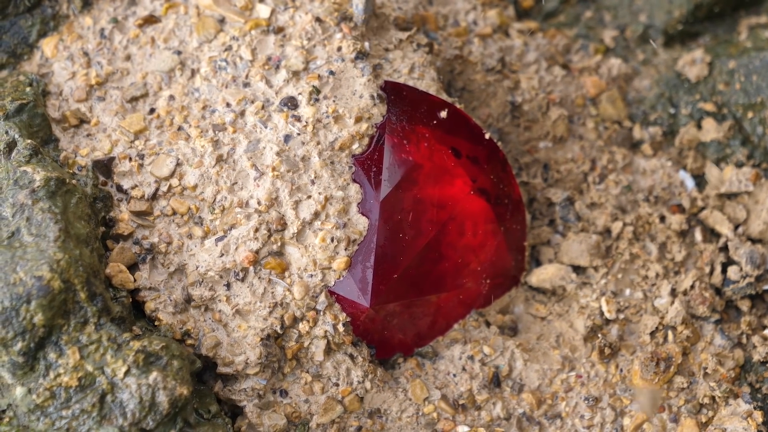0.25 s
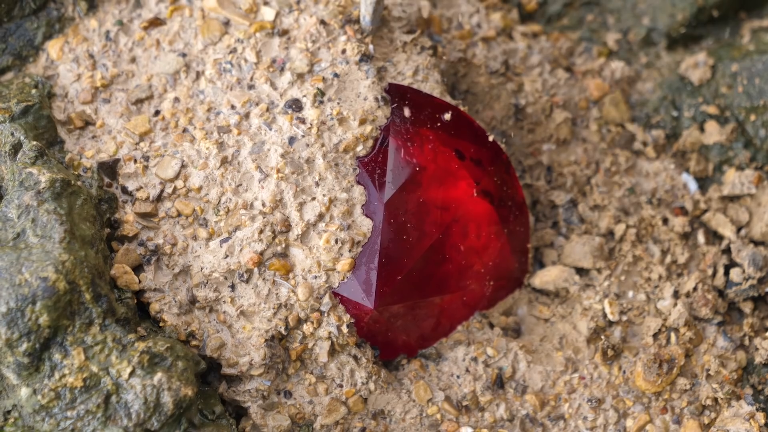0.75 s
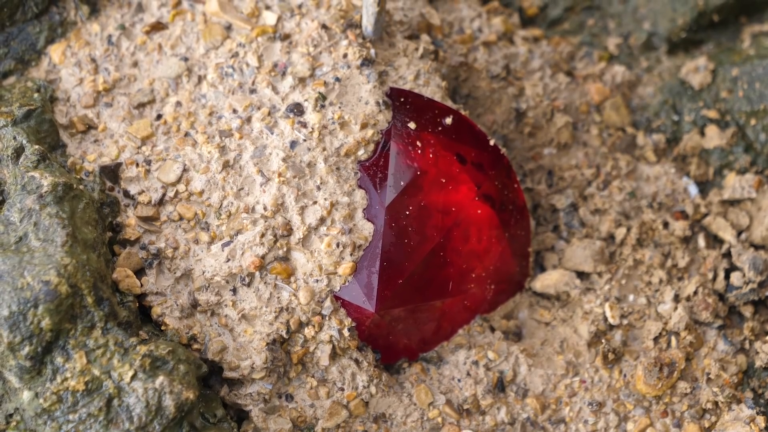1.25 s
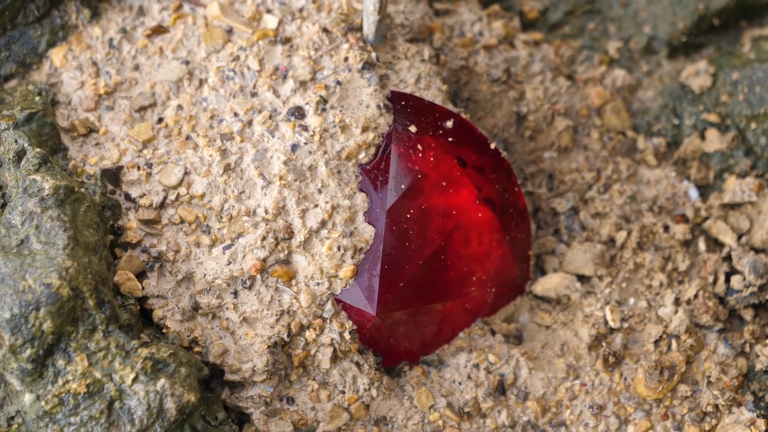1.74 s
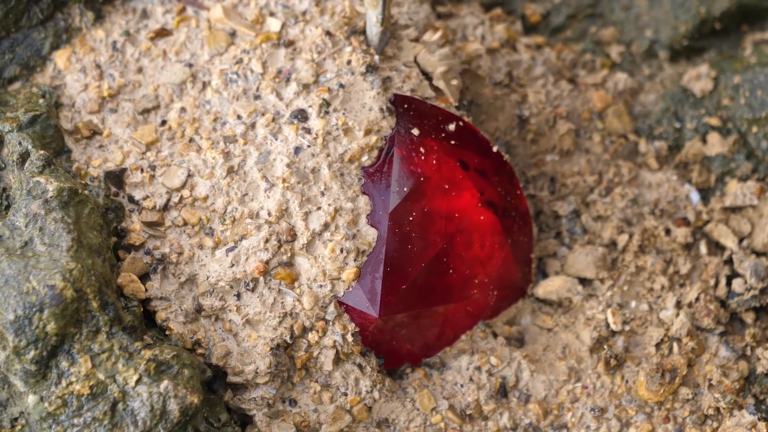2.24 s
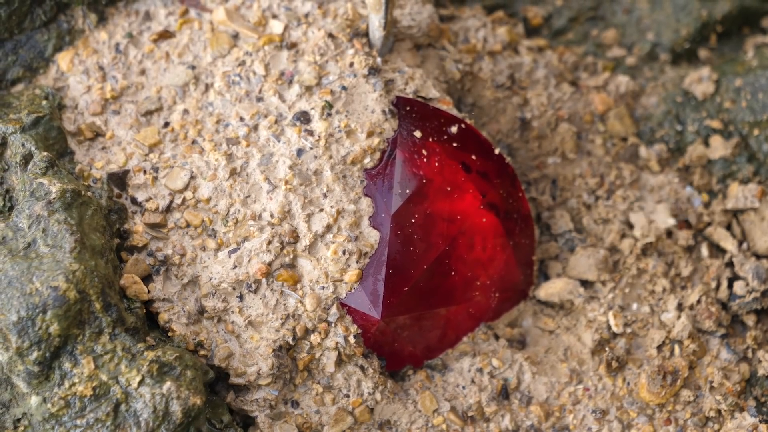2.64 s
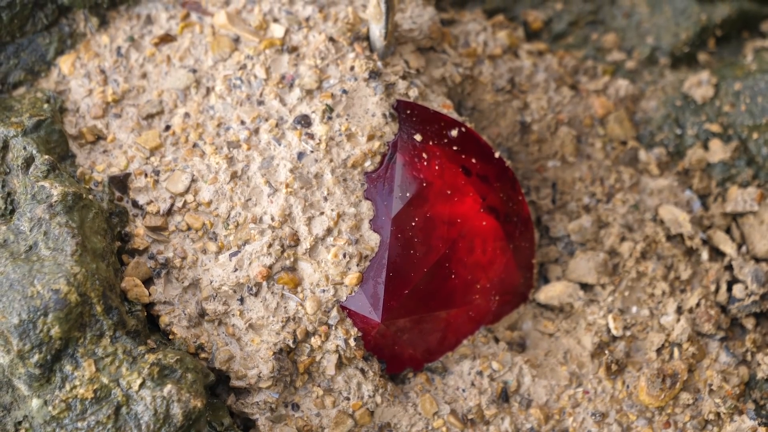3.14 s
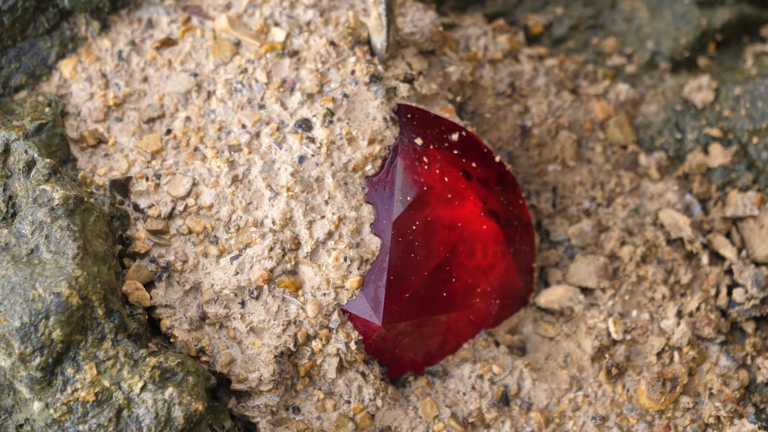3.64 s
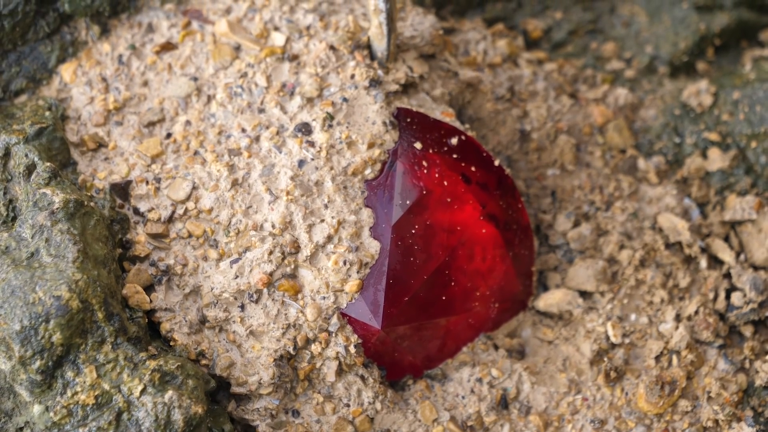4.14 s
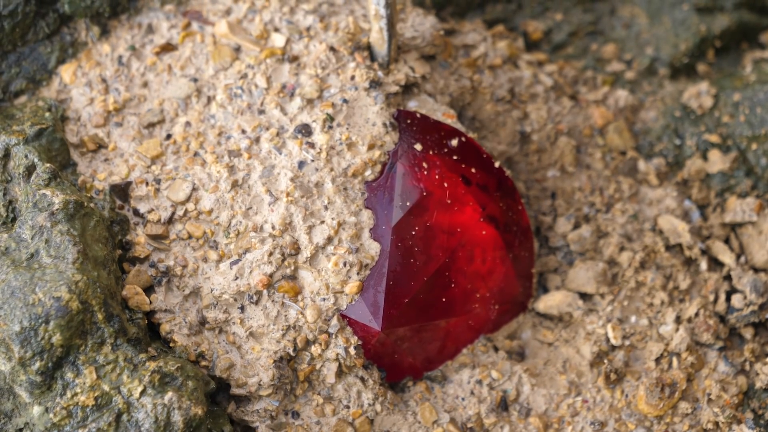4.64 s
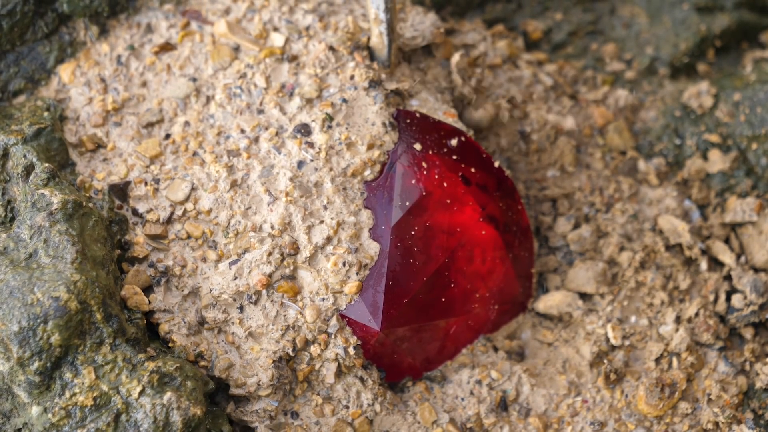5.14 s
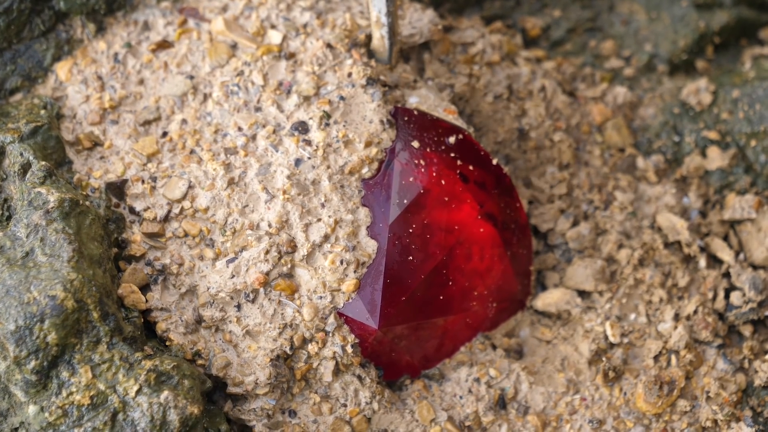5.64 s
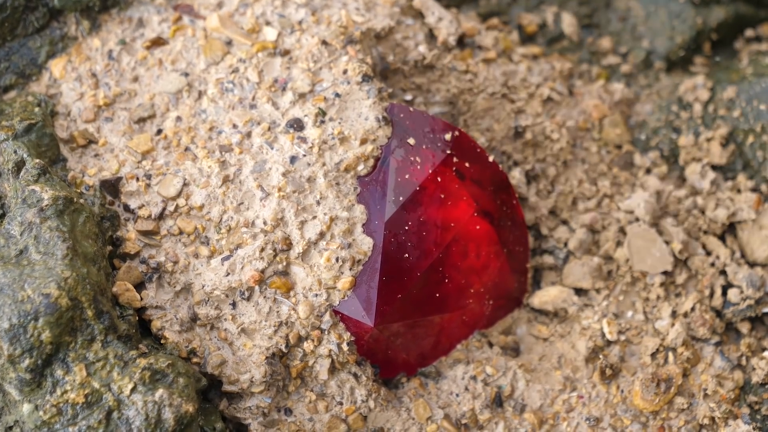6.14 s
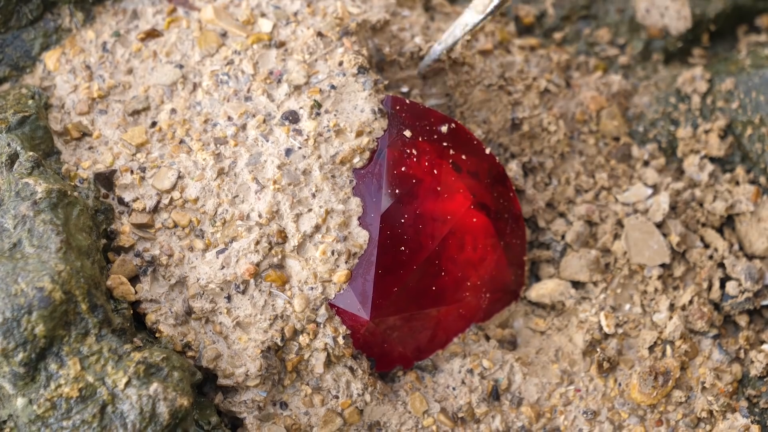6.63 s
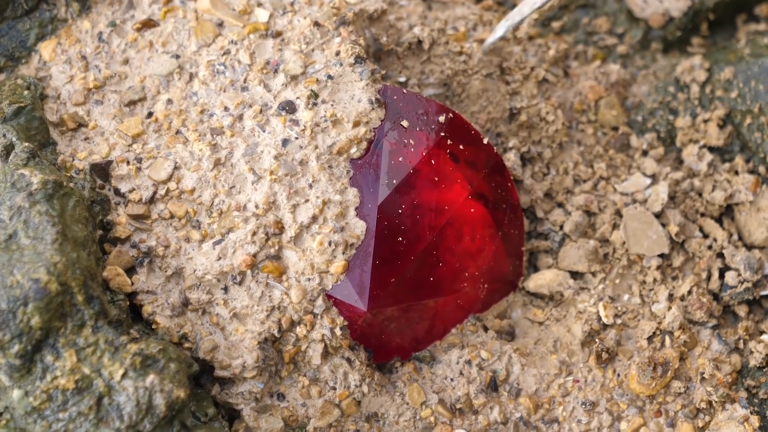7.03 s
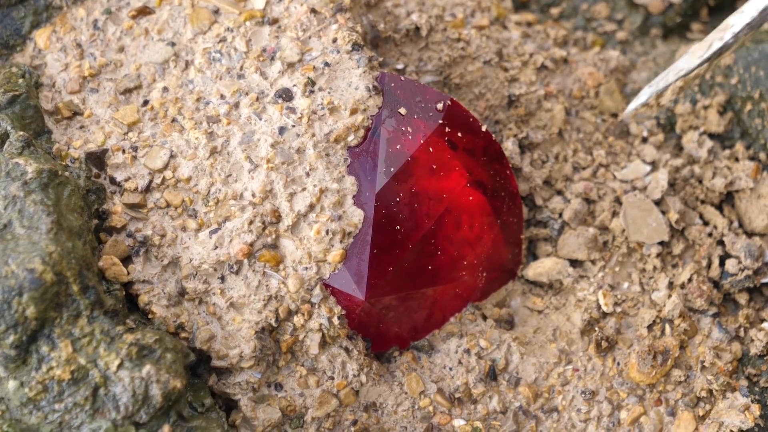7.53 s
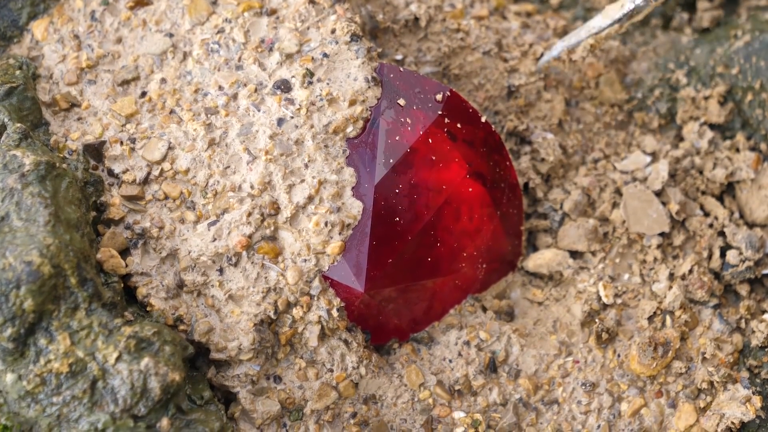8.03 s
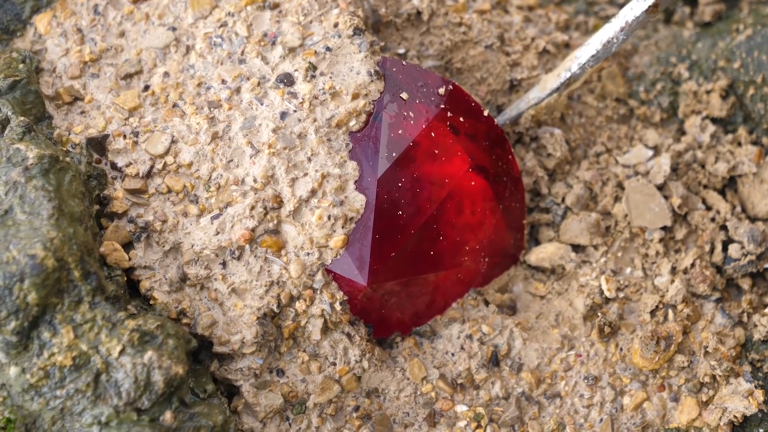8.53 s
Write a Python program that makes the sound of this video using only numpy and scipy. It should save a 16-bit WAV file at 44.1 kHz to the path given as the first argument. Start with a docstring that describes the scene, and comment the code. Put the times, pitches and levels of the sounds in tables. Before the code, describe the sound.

Close up outdoors, a steel pick chips at crumbly sandstone. From 0 to about 5.6 seconds it taps steadily, a little over four times a second: very short, loud, dry clicks with a sandy crunch and a quickly damped metallic ring. Their weight varies; some are thin and bright, while those from about 3 seconds on are often fuller and more biting. Faint short echoes and tiny falling crumbs follow. After the last tap near 5.6, quieter short scrapes begin: a gritty one with snapping grains at 6.0-6.1, a scratchy cluster from 6.5 to 7.5, another clear stroke at 7.7, a duller one around 8.2, then barely audible brushing near 8.5. Scrapes sit slightly right. Behind lies soft, uneven distant rumble and hiss, with faint, falling bird whistles near 1.3, 3.1 and 7.9 seconds.

```python
"""Steel pick in sandstone

A steel pick taps crumbly sandstone about four times a second, close by and outdoors, then scrapes in short strokes.
Taps are filtered noise bursts plus decaying sines; scrapes are random grains and slips coloured by resonances.
Single bright ticks are falling crumbs. Faint filtered-noise echoes follow the pick. Behind it lie a distant
rumble and hiss of shaped noise, and a small bird made of gliding sines."""
import sys
import numpy as np
from scipy import signal
from scipy.fft import rfft, irfft
from scipy.io import wavfile
from scipy.ndimage import uniform_filter1d

SR = 44100
rng = np.random.default_rng(int(sys.argv[2]) if len(sys.argv) > 2 else 0)


def generate_wav(sig):
    """Save sig (samples, or channels by samples) to the path in sys.argv[1] as 16-bit PCM at SR."""
    pcm = np.round(np.clip(np.atleast_2d(sig).T, -1, 1) * 32767).astype(np.int16)
    wavfile.write(sys.argv[1], SR, pcm)


N = 387198  # length in samples
FILTER_LENGTH = 4096  # samples
HZ = np.fft.rfftfreq(FILTER_LENGTH, 1 / SR)  # the frequencies at which every colour is drawn

# The taps of the pick. Each row: start in seconds, boost of the stone's low body (below about 1.6 kHz) in dB.
BLOWS = [(-.018, -18), (.215, -8.5), (.4456, -6), (0.6866, -5.5), (0.9203, 1), (1.1553, 0), (1.3897, -9.5),
         (1.6277, 6.5), (1.858, -0.5), (2.091, -13.5), (2.3262, -17), (2.5593, -5), (2.7891, -7),
         (3.0208, 3), (3.251, 2), (3.4903, -9), (3.722, 0), (3.9526, 4), (4.1863, 3), (4.4245, -7.5),
         (4.6613, 3.5), (4.8923, 4.5), (5.1239, 3), (5.351, 5), (5.5758, 7)]
# The scraping strokes. Each row: start in seconds, length in seconds, level in dB, contact resonance in Hz.
STROKES = [(5.779, .11, -50, 9000), (6.035, 0.092, -22, 4280), (6.499, 0.067, -22.5, 3520),
           (6.707, 0.031, -29.5, 2570), (6.763, 0.088, -26.5, 3980), (6.956, .012, -31, 3400),
           (6.983, 0.078, -28, 4800), (7.134, .06, -35, 3827), (7.215, .065, -33.5, 3760),
           (7.355, 0.042, -34, 3173), (7.402, 0.077, -30.5, 3210), (7.678, .03, -34, 2397),
           (7.719, .1, -21.5, 3940), (8.226, 0.059, -24.5, 2203), (8.47, 0.051, -43.5, 2203),
           (8.577, 0.13, -54.5, 4300)]


def taps(crush_s=0.00094, length_s=0.0031, ripple_db=1.4, dull_share=0.41):
    """Each blow crushes and scatters sand and sets the steel ringing; the stone damps it by a varying amount."""
    # Broad colour of a tap. Each row: frequency in Hz, level in dB.
    tap_colour = [(40, -43), (200, -15.5), (600, -16.5), (1300, -8), (2800, -6.5), (5000, -5), (7700, -7.5),
                  (9200, -2.5), (11000, -12.5), (15000, -14.5)]
    # Resonances of the pick wedged in the stone. Each row: frequency in Hz, width in Hz, boost in dB.
    wedged_modes = [(1860, 85, 3.5), (2542, 100, 6.5), (3663, 178, 12), (4490, 350, 6.5), (6380, 457, 11.5),
                    (9000, 740, 4)]
    # Free ringing of the steel. Each row: frequency in Hz, level in dB, seconds to fade by 60 dB before damping varies.
    steel_modes = [(9120, -22.5, 0.12), (9140, -27, 0.0406), (3530, -28, 0.023), (1806, -32, 0.041)]
    # Bite near 6 kHz, which drifts up and down over the taps; when it is strong, the band near 4.8 kHz is weaker.
    # Each row: time in seconds, boost in dB.
    bite_course = [(0, -2), (1.2, -5.5), (2.3, -2), (3, 7), (4, 1.5), (5, -0.5), (5.5, 5)]
    tap_db, ring_db, ring_spread_db = -6.5, 8.5, 3.5
    crumble_after_s, crumble_db = .0018, -5.5  # the crushed sand gives way once more
    spray_db, spray_s = -26, .016  # loosened sand sprays from each tap and dies away
    out = np.zeros((2, N))
    t = np.arange(2 * FILTER_LENGTH) / SR
    spray_fade = np.exp(-t[:FILTER_LENGTH] / spray_s)
    for start, body_db in BLOWS:
        bite_db = np.interp(start, *np.transpose(bite_course))
        steel_db = ring_db + ring_spread_db * rng.standard_normal()
        body = body_db * below(1600)
        bite = bite_db * (hump(6150, 750) - dull_share * hump(4800, 410))
        tone = colour(tap_colour, wedged_modes) + body + bite + ripple_db * ripple()

        crush = fracture(crush_s, even=0.86)
        add(crush, crumble_after_s, amp(crumble_db) * fracture(crush_s, even=1.0))
        tap = signal.fftconvolve(crush, response(tone)) * np.sqrt(length_s * SR)

        spray = amp(spray_db) * grit(FILTER_LENGTH, spray_db) * spray_fade
        add(tap, 0, signal.fftconvolve(spray, response(colour(tap_colour) + body)))

        for hz, mode_db, t60 in steel_modes:
            detune = rng.normal(1, .002)
            damping = rng.uniform(.9, 2.0)
            fade = amp(steel_db + mode_db - 60 * damping * t / t60)
            add(tap, 0, fade * np.sin(2 * np.pi * hz * detune * t))
        add(out, start, outdoors(amp(tap_db) * tap, wet_db=7.5))
    return out


def fracture(decay_s, even):
    """A burst of micro-cracks of energy 1: noise that rises fast and dies away; 'even' flattens its spectrum."""
    t = np.arange(FILTER_LENGTH) / SR
    shape = (1 - np.exp(-t / 0.00029)) * np.exp(-t / decay_s)
    spectrum = rfft(rng.standard_normal(FILTER_LENGTH) * shape)
    flattened = spectrum / (abs(spectrum) + 1e-9) ** min(even, 1)
    burst = irfft(flattened) * (t < .02)
    return burst / np.linalg.norm(burst)


def scrapes(grit_db=-2, count=12):
    """The point drags over sand, catching and slipping under a changing pressure; some large grains snap."""
    # The largest grains that snap under the point. Each row: time in seconds, level in dB, contact resonance in Hz.
    snap_rows = [(6.0745, -4.5, 4340), (6.1, -8, 4330), (6.116, -3.5, 4370), (6.1347, -17, 4000),
                 (6.402, -24.5, 1600), (6.5088, -11.5, 3700), (6.541, -11, 3740), (6.796, -12.5, 3680),
                 (6.8092, -11, 3600), (6.818, -12, 4400), (7.0355, -17, 4800), (7.1423, -21, 3660),
                 (7.2627, -18.5, 6480), (7.2909, -17, 3040), (7.4597, -11, 3440), (7.7541, -8.5, 4400),
                 (8.1101, -23, 2274), (8.2502, -14, 2195), (8.2806, -11, 2210)]
    press_share = 0.6  # the hand bears down for this share of a stroke, then lifts
    slips_per_s, slip_db, slip_spread_db = 75, 6, 7.5  # dB above the stroke's level, and spread either way
    contact_db = 7.5
    out = np.zeros((2, N))
    for start, length, db, contact_hz in STROKES:
        n = round(length * SR)
        pressure_phase = np.interp(np.arange(n) / n, [0, press_share, 1], [0, np.pi / 2, np.pi])
        pressure = np.sin(pressure_phase)
        drive = np.zeros(n + FILTER_LENGTH)
        for k, (late, size) in enumerate(rng.uniform(-1, 1, (count, 2))):
            slip_s = (k + .5 + late / 2) / slips_per_s
            if slip_s * SR < n:
                slip = snap(db + slip_db + slip_spread_db * size)
                add(drive, slip_s, pressure[int(slip_s * SR)] * slip)
        add(drive, 0, amp(db + grit_db) * grit(SR // 4, db)[:n] * evened(pressure))
        add(out, start, through_pick(drive, contact_hz, contact_db))
    for start, db, contact_hz in snap_rows:
        add(out, start, through_pick(snap(db), contact_hz, contact_db=13.5))
    return out


def grit(n, db, grains_per_s=400, spread_db=4, clump_db=4.0, count=3):
    """Sand catches in clumps, each kind of grain with its own colour; more pressure, more grains; rms 1."""
    rate = grains_per_s * amp(db + 31.0) ** .5  # the given rate holds at -31 dB
    out = np.zeros(n)
    for _ in range(count):
        sizes = amp(spread_db * np.minimum(rng.exponential(1, n), 3)) * rng.choice([-1, 1], n)
        clicks = (rng.random(n) < rate / SR) * sizes
        grains = evened(clicks) + .3 * rng.standard_normal(n)
        clumps = evened(uniform_filter1d(rng.standard_normal(n + FILTER_LENGTH), size=250))[:n]
        grain_sound = fracture(0.00055, even=0.29)
        out += signal.fftconvolve(grains * amp(clump_db * clumps), grain_sound)[:n]
    return evened(out)


def snap(db, snap_s=0.0015):
    """One grain breaks in a short burst of micro-cracks."""
    return amp(db) * np.sqrt(0.0015 * SR) * fracture(snap_s, even=0.78)


def through_pick(drive, contact_hz, contact_db, contact_width_hz=300, ripple_db=2):
    """The sliding pick colours its point's sound: a looser contact resonates lower and has weaker treble."""
    # Broad colour of scraped grit. Each row: frequency in Hz, level in dB.
    grit_colour = [(100, -50), (500, -6), (950, -6), (1300, 8), (3300, 7), (4400, 12), (5500, -3.5),
                   (7000, 7), (8300, -9), (10000, -13), (11500, -16), (13500, -13.5), (16000, -53)]
    # Resonances of the pick with its point sliding. Each row: frequency in Hz, width in Hz, boost in dB.
    sliding_modes = [(731, 90, 10.5), (6470, 170, 3), (9730, 600, 14.5)]
    firm_hz = 4450  # contact resonance that counts as firm
    coarse_db = 3.5  # body of the sand under the sliding point
    fine_db, fine_db_per_octave = 5, -10  # treble of a firm contact, and its change as the contact loosens
    loose_octaves = np.log2(firm_hz / contact_hz)
    tone = colour(grit_colour, sliding_modes) + ripple_db * ripple()
    tone = tone + contact_db * hump(contact_hz, contact_width_hz)
    tone = tone + coarse_db * below(2220)
    tone = tone + (fine_db + fine_db_per_octave * loose_octaves) * (1 - below(5000))
    return outdoors(signal.fftconvolve(drive, response(tone)), wet_db=-7)


def crumbs(count=45, crumb_db=-50, spread_db=4):
    """Loosened sand lands with tiny bright ticks a moment after a tap or the start of a stroke."""
    out = np.zeros(N)
    causes = [row[0] for row in [*BLOWS, *STROKES]]
    tick = response(colour([(1000, -12.5), (4000, -9), (9000, 6.5), (16000, -27.0)]))
    for which, fall, size in rng.random((count, 3)):
        landing = causes[int(which * len(causes))] + 0.065 + 0.15 * fall
        add(out, landing, amp(crumb_db - spread_db * np.log(size + .01)) * tick)
    return out


def outdoors(x, wet_db, width=0.22):
    """A sound and its echoes at both ears; only the echoes differ between them."""
    mid, side = (amp(wet_db) * signal.fftconvolve(x, surroundings()) for _ in range(2))
    add(mid, 0, x)
    return np.array([mid + width * side, mid - width * side])


def surroundings(scatter_db=-29, t60=0.2, ripple_db=3):
    """Rough surfaces return echoes, the later the more smeared, over a thin, short tail."""
    # Echoes before their colour and the overall echo level. Each row: delay in seconds, level in dB.
    echo_rows = [(.005, -22.5), (0.013, -26.5), (0.015, -32), (0.029, -41), (.038, -37), (.049, -43),
                 (0.077, -44.5), (.1, -49.5)]
    # Colour of all echoes. Each row: frequency in Hz, level in dB.
    echo_tone = [(200, -5), (1500, 2.5), (2800, -6.5), (4400, 0.5), (6500, -5.5), (9000, -7.5),
                 (15000, -20)]
    t = np.arange(SR // 4) / SR
    tail = rng.standard_normal(len(t)) * amp(-60 * t / t60) * (t > .004)
    echoes = evened(tail) * amp(scatter_db) / np.sqrt(len(t))
    for delay, db in echo_rows:
        smear = signal.windows.hann(round((.004 + delay / 5) * SR))
        echo = evened(smear * rng.standard_normal(len(smear))) / np.sqrt(len(smear))  # energy 1
        add(echoes, delay - len(smear) / SR / 2, amp(db) * echo)
    return signal.fftconvolve(echoes, response(colour(echo_tone) + ripple_db * ripple()))


def bird():
    """Thin, distant whistles: sines that all glide down alike."""
    # The whistles. Each row: start in seconds, level in dB.
    whistle_rows = [(1.28, -59), (3.12, -62), (7.875, -55)]
    whistle_s, from_hz, to_hz = .08, 8100, 4600
    out = np.zeros(N)
    n = round(whistle_s * SR)
    glide = np.sin(2 * np.pi * np.cumsum(np.linspace(from_hz, to_hz, n)) / SR)
    for start, db in whistle_rows:
        add(out, start, amp(db) * glide * signal.windows.tukey(n, .7))
    return out


def distance(patchy_db=3.5, side_db=-20, swell_width_hz=120):
    """Far outdoor rumble and hiss: noise swelling in patches of time and pitch, nearly the same at both ears."""
    # Broad colour of the distant noise. Each row: frequency in Hz, level in dB.
    air_colour = [(18, -66), (30, -40), (157, -4.5), (374, -11), (499, -14), (1910, -24), (2610, -31),
                  (3580, -26), (5040, -30.5), (6380, -33.5), (8740, -38.5), (16000, -48.5)]
    # Humps in the distant noise. Each row: frequency in Hz, width in Hz, boost in dB.
    drone_humps = [(137, 46, 2.5), (2207, 760, 8.5), (3000, 570, -2)]
    # Boost of the rumble under 200 Hz over time. Each row: time in seconds, boost in dB.
    rumble_course = [(0, -2), (3.2, -1), (3.65, 4.5), (4.1, 0.5), (4.6, 4), (5.2, -1), (6.35, 3), (6.8, -2),
                     (8.8, 0.5)]
    # Brief swells in one band. Each row: middle in seconds, half length in seconds, frequency in Hz, boost in dB.
    swell_rows = [(1.464, 0.03, 1450, 12.5), (1.76, 0.061, 1250, 16.5)]
    air_db = -44.5
    noise = rng.standard_normal((2, N + FILTER_LENGTH))
    noise = signal.oaconvolve(noise, response(colour(air_colour, drone_humps))[None], axes=1)
    noise = noise[:, FILTER_LENGTH:FILTER_LENGTH + N]  # skip the filter's start
    hz, t, spectra = signal.stft(noise, SR, nperseg=2048)
    hz = hz[:, None]

    patches = uniform_filter1d(rng.standard_normal(spectra.shape[1:]), size=4, axis=0)
    patches = evened(uniform_filter1d(patches, size=4, axis=1))
    field_db = patchy_db * patches / (1 + hz / 4000)  # the treble is steadier
    field_db = field_db + np.interp(t, *np.transpose(rumble_course)) * (hz < 200)
    for middle, half_s, centre_hz, db in swell_rows:
        in_time = ((t - middle) / half_s) ** 2
        in_pitch = ((hz - centre_hz) / swell_width_hz) ** 2
        field_db = field_db + db * np.exp(-in_time - in_pitch)
    field = signal.istft(spectra * amp(field_db), SR, nperseg=2048)[1][:, :N]
    mid, side = amp(air_db) * evened(field)
    return np.array([mid + amp(side_db) * side, mid - amp(side_db) * side])


def amp(db):
    """Turns decibels into a gain."""
    return 10 ** (np.asarray(db) / 20)


def evened(x):
    """Scales to rms 1."""
    return x / np.sqrt(np.mean(x ** 2) + 1e-20)


def add(mix, s, sound):
    """Mixes a sound in at time s; of a sound begun before time 0, only the rest is heard."""
    at = round(s * SR)
    sound = sound[..., max(-at, 0):]
    part = mix[..., max(at, 0):][..., :sound.shape[-1]]
    part += sound[..., :part.shape[-1]]


def hump(hz, width):
    """Bell shape of one resonance, top 1."""
    return 1 / (1 + ((HZ - hz) / width) ** 2)


def below(hz):
    """Smooth shelf: near 1 well under hz, half at hz, near 0 well above."""
    return 1 / (1 + (HZ / hz) ** 4)


def ripple(size=40):
    """Random humps and dips across the spectrum, rms 1 before they are faded out in the bass."""
    bumps = uniform_filter1d(rng.standard_normal(len(HZ)), size, mode="wrap")
    bumps = uniform_filter1d(bumps, size, mode="wrap")
    return evened(np.tanh(evened(bumps))) * (1 - below(500))


def colour(points, resonances=()):
    """A spectrum in dB from a broad outline and resonances."""
    f, db = np.transpose(points)
    outline = np.interp(np.log(HZ + 1), np.log(f), db)
    return outline + sum(boost * hump(hz, width) for hz, width, boost in resonances)


def response(db):
    """Turns a dB spectrum into a filter of energy 1 that sounds only after its cause (minimum phase)."""
    log_gain = np.log(amp(np.r_[db, db[-2:0:-1]]))
    spectrum = np.exp(np.conj(signal.hilbert(log_gain)))
    h = irfft(spectrum[:FILTER_LENGTH // 2 + 1])
    return h / np.linalg.norm(h)


def placed(x, right_db):
    """Leans a source to the right by a level difference between the ears."""
    return x * amp([[-right_db / 2], [right_db / 2]])


def scene():
    """Taps, crumbs and bird near the centre, scraping a little to the right, the distance a little to the left."""
    near_centre = placed(taps() + crumbs() + bird(), .3)
    return near_centre + placed(scrapes(), 1.7) + placed(distance(), -1)


def gain_control(x, threshold_db=-4, recover_db_per_s=65, attack_s=0.0033):
    """Loud peaks turn the gain down within milliseconds; it creeps back, so the background dips after them."""
    fall = np.arange(N) * recover_db_per_s / SR
    level_db = 20 * np.log10(abs(x).max(0) + 1e-9)
    peak_db = np.maximum.accumulate(level_db + fall) - fall  # jumps up at once, sinks steadily
    keep = np.exp(-1 / (attack_s * SR))
    excess_db = np.maximum(peak_db - threshold_db, 0)
    return x / amp(signal.lfilter([1 - keep], [1, -keep], excess_db))


def record(dry, ceiling=0.97):
    """Gain control, two slightly unlike microphone ports, soft overload of peaks, then the band limit."""
    edge_hz = 16300
    mismatch_db = .7 * ripple(size=24) * (2 - below(11000))  # larger in the top treble
    ports = np.array([response(mismatch_db), response(-mismatch_db)])
    heard = signal.oaconvolve(gain_control(dry), ports, axes=1)[:, :N]
    squashed = heard / (1 + (heard / ceiling) ** 6) ** (1 / 6)
    band_limit = signal.firwin(255, edge_hz, window=("kaiser", 7), fs=SR)
    return signal.oaconvolve(squashed, band_limit[None], "same")


dry = scene()
out = record(dry)
generate_wav(out)
```